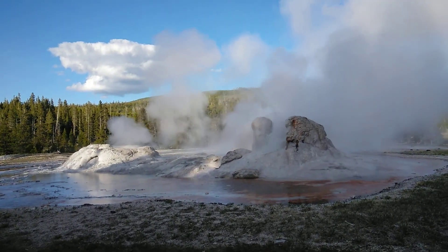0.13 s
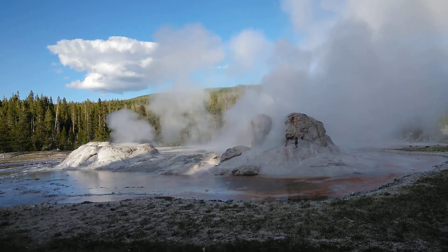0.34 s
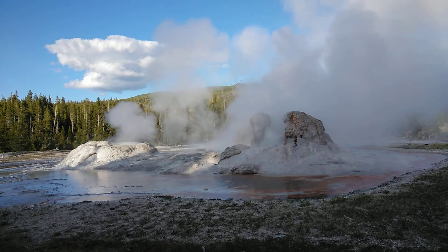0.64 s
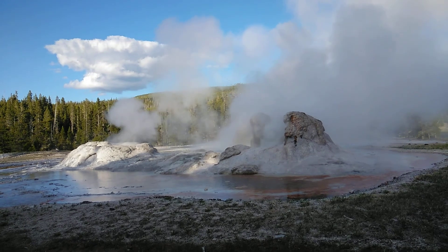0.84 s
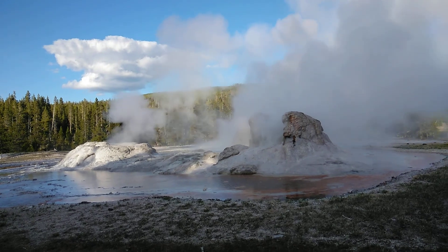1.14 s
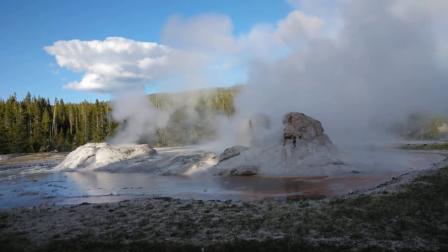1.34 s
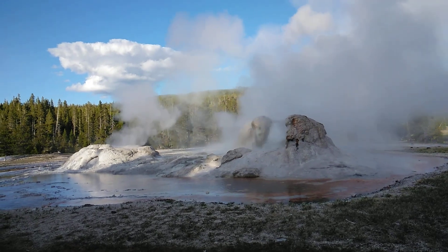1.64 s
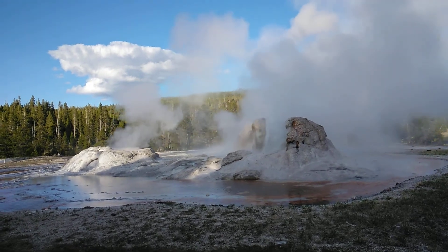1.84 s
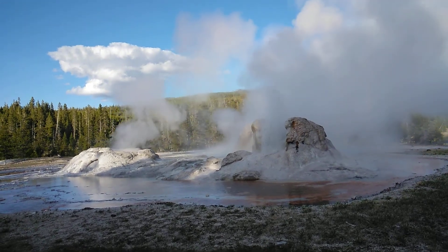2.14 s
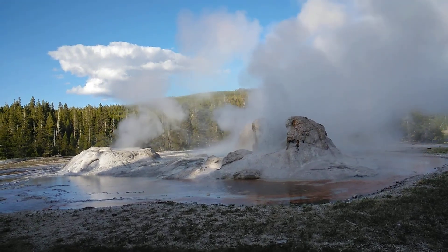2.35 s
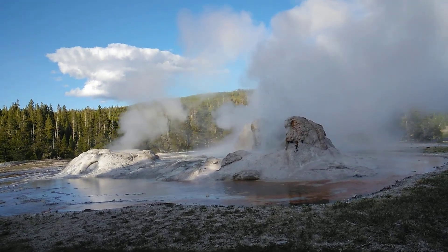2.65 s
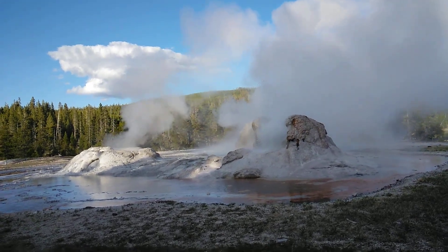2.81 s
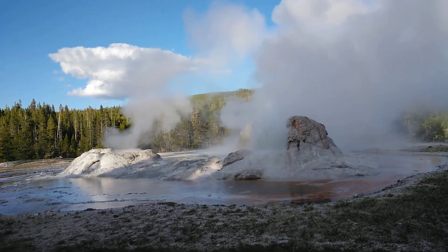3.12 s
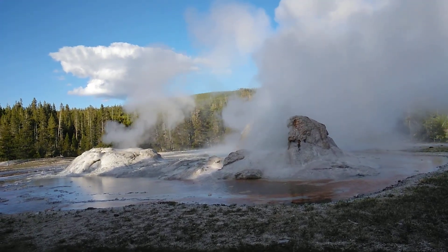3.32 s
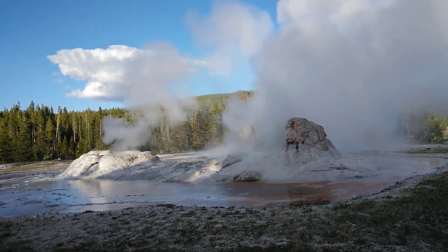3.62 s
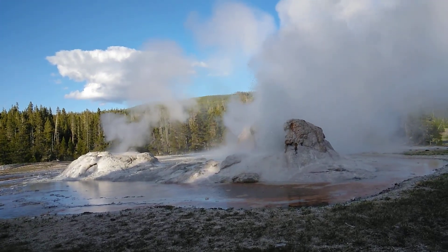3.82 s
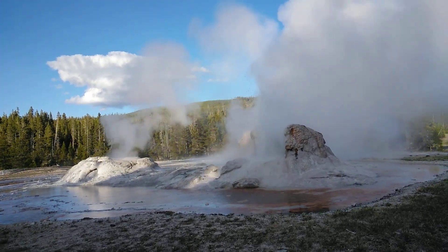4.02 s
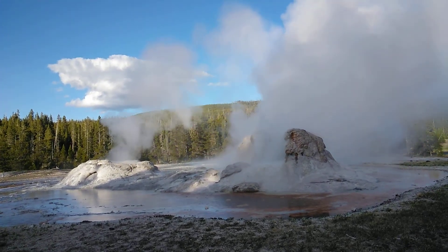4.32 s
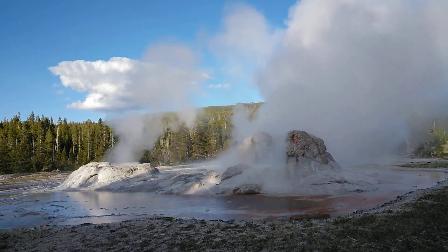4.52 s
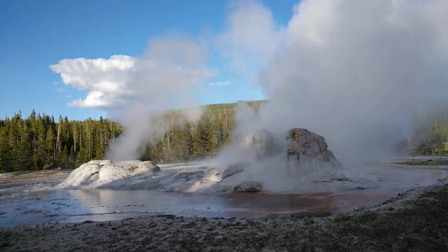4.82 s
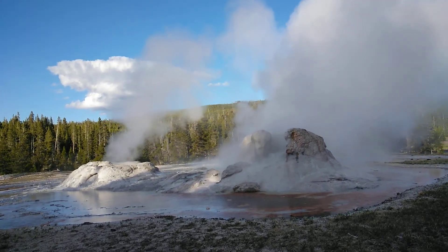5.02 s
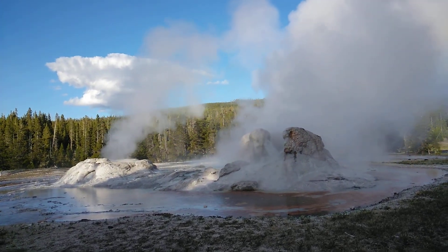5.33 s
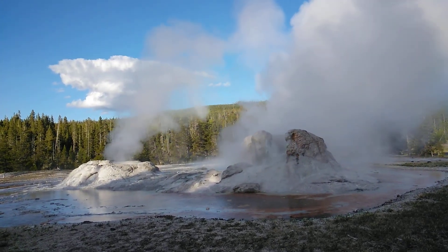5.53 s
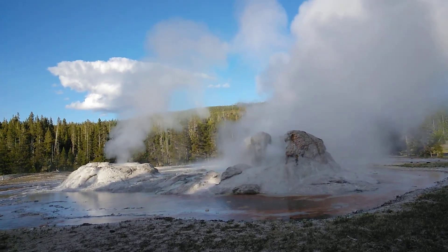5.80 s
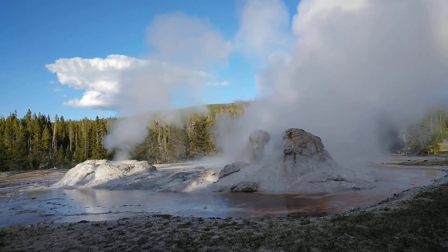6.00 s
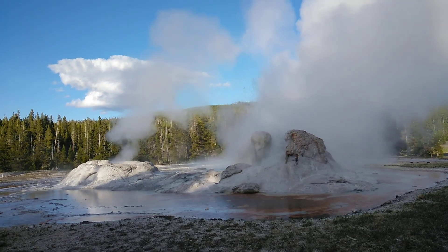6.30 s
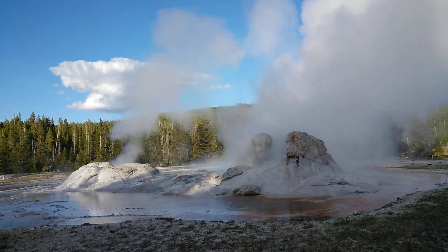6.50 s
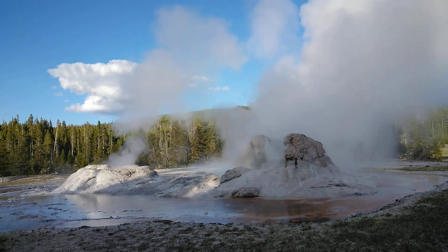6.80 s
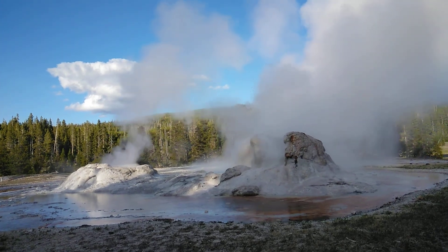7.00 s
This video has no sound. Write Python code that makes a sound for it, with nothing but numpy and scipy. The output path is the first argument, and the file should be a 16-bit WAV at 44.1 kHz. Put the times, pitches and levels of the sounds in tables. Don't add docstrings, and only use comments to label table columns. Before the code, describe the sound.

A geyser rumbles low under sloshing water, then surges with bright hissing spray and hard water slaps before easing back to a quieter wash.

```python
import sys
import numpy as np
from scipy import signal
from scipy.fft import rfft, irfft, next_fast_len
from scipy.io import wavfile
from scipy.ndimage import uniform_filter1d, map_coordinates

SR = 44100
rng = np.random.default_rng(int(sys.argv[2]) if len(sys.argv) > 2 else 0)


def gain_from_db(level_db):
    decades = np.asarray(level_db, float) / 20
    return 10 ** decades


def wav_record(signal):
    frames = np.transpose(np.atleast_2d(signal))
    bounded = np.clip(frames, -1, 1)
    quanta = np.round(bounded * 32767).astype(np.int16)
    wavfile.write(sys.argv[1], SR, quanta)


N = 315298

# frequency in Hz, density in dB per Hz.
RUMBLE_SPECTRUM = [(25, -16.5), (45, -6.5), (70, 4.5), (120, 3.5), (200, -1.5), (300, -4.5), (450, -13.5),
                   (650, -59), (900, -120)]
SPRAY_SPECTRUM = [(1500, -12), (2800, -0.5), (3800, 0.5), (7000, -1), (12000, 0), (13300, -6.5), (14300, 2),
                  (15200, -9)]
SPLASH_SPECTRUM = [(500, -58), (900, -12), (1300, -2), (2800, -2.5), (4000, -4.5), (4600, -8), (6000, -41)]
SLOSH_SPECTRUM = [(250, -49), (450, -2), (800, -2), (1100, -4), (1500, -16.5), (2500, -62)]
# frequency in Hz, density in dB per Hz.
CRACK_SPECTRUM = [(1500, -20), (2800, -6), (4000, -3), (7000, 0), (12000, 2), (13300, -4), (14300, 2),
                  (15200, -9)]

# time in seconds, spray level in dB, extra load of heavy water in dB.
JET = [(0.0, -43, 2), (0.42, -46, 5), (0.78, -44, -0.5), (1.2, -38, 1), (1.84, -43.5, 4), (1.9, -51, 5),
       (2.1, -48.5, 4), (2.67, -39.5, 3), (3.07, -35, -3), (3.37, -27.5, -5.5), (3.86, -36.5, 0.5),
       (4.2, -34.5, 1), (4.44, -31, 0), (4.84, -33.5, 0), (5.2, -50, 2.5), (5.45, -54.5, -1.5),
       (6.35, -47, 5.5), (7.15, -46.5, -0.5)]
# time in seconds, jump in dB, half length in seconds.
GUSHES = [(1.47, 0.5, .03), (2.02, 0.5, 0.018), (2.73, 2.5, .05), (2.77, 6, 0.011), (2.84, 3.5, 0.0094),
          (3.67, 0.5, 0.032), (3.87, -3, 0.029), (4.41, 1, 0.028), (5.22, 1.5, 0.019), (5.5, 0, 0.022),
          (6.22, -0.5, 0.035), (6.87, 1.5, 0.034), (2.93, 4.5, 0.091), (2.97, 0.5, 0.0091),
          (3.33, 2.5, 0.061), (3.385, 0, 0.031), (3.98, 2, 0.098), (4.3, 0.5, 0.018), (5.76, -0.5, 0.026),
          (5.73, 1.5, 0.044), (2.8, 0.5, .1), (5.87, -1.5, 0.032), (6.05, -1.5, 0.096)]
# time in seconds, jump in dB, half length in seconds.
HEAVES = [(.36, -2.5, 0.062), (.65, 4, 0.13), (1.33, 1, 0.048), (2.95, 2, 0.28), (3.42, 4, 0.049),
          (3.83, -5, 0.029), (5.08, -3.5, 0.21), (5.46, 5, 0.036), (6.95, 3, 0.1), (.2, 1.5, 0.088),
          (2, 0, 0.17), (4.55, -2.5, 0.097), (6, -2, 0.08), (6.2, 0.5, 0.051), (6.67, 0, .07),
          (7.12, 1.5, 0.046)]
# time in seconds, jump in dB, half length in seconds.
FALLS = [(2.8, -4, 0.088), (2.2, 2, 0.36), (4.41, 6.5, 0.022), (.08, 2.5, 0.034), (2.4, -1.5, 0.019),
         (2.7, 0, 0.054), (4.2, -3.5, 0.024), (5.9, 5.5, 0.022), (6.7, 1.5, 0.023), (6.75, -1, .04),
         (6.97, -5, 0.025), (2.3, 0, 0.081), (5.2, -7, 0.042), (6.42, 1.5, 0.025), (9, -1.5, 0.072),
         (5.63, -4.5, 0.083), (5.45, -0.5, 0.064), (0.042, -2.5, 0.11), (0.9, 2.5, .15), (2.9, 1, .1),
         (3.5, 1, .08), (4.7, 2, .08), (5.8, -3.5, .07), (5.15, -3.5, .04), (5.92, -7, 0.077),
         (6.07, -2, .06), (7.1, 2, .05)]
# time in seconds, jump in dB, half length in seconds.
POOL = [(.78, -1, 0.1), (1.45, 1.5, 0.15), (2.22, -3.5, 0.21), (3.54, -8.5, 0.06), (3.8, 2.5, 0.2),
        (4.95, -1, 0.13), (5.25, 2, 0.041), (5.6, 2, 0.057), (6.9, 0, 0.079), (5.82, 2.5, .05),
        (.15, -2, 0.12), (1.87, -1.5, 0.076), (2.6, -2.5, 0.2), (7.1, 2.5, .06), (6.01, -12, 0.11),
        (6.35, -6.5, 0.053), (6.75, -2, 0.053)]
# time in seconds, jump in dB, half length in seconds.
BIG_DROPS = [
    (.12, 2.5, 0.19),
    (4.45, 2, .1),
    (4.9, 1.5, 0.09),
    (5.36, -2, .04),
    (5.47, 1.5, .04),
    (5.57, -2.5, 0.037),
    (5.68, -3, 0.045),
    (5.87, -2, 0.053),
    (6.07, -5, .1),
    (7.1, -3.5, .06),
]
BIG_DROP_HZ = (2500, 4150)
# start in seconds, burst energy in dB.
SLAPS = [(.388, -16), (.4454, -16), (.4793, -15), (.4983, -15), (1.0406, -9), (1.6639, -12), (1.7543, -10),
         (1.8398, -11), (2.6997, -8), (2.7546, -4), (2.7663, 2.5), (2.7734, -4), (2.8016, -6), (2.8804, -7),
         (2.9072, -3), (2.9645, -2), (2.9683, 4), (2.982, -7), (3.063, -1.5), (3.0982, -4.5), (3.1841, -1),
         (3.2824, -4), (3.3294, 1), (3.3332, 4), (3.3475, -1), (3.354, -1), (3.3795, -1), (3.3835, -1),
         (3.3877, 9.5), (3.4908, 0), (3.5306, -3), (3.5604, -2.5), (3.994, -4), (4.2514, -8),
         (4.2959, -3.5), (4.3034, -3.5), (4.418, -4), (4.638, -5.5), (4.8374, -5), (4.9061, -7),
         (4.9269, -6), (5.1357, -18), (5.223, -21.5), (5.2812, -18), (5.366, -23), (5.5273, -24),
         (5.6976, -22), (5.7301, -19), (5.7599, -20), (5.8008, -21), (5.9153, -22), (5.9207, -22),
         (6.3293, -15), (6.4645, -17), (6.475, -17.5), (6.721, -15), (6.7383, -16), (6.7491, -17.5),
         (6.7973, -17), (6.8758, -15), (6.9871, -19)]
# time in seconds, right-side gain in dB of sloshing, of falling water, of spray.
DRIFT = [(0, -2, -0.5, 0.5), (.5, -4, -3.5, 0.5), (.9, -2, -2, 0.5), (1.6, 1.5, 0.5, 0),
         (1.9, -4.5, -4.5, -0.5), (2.6, -4, 0, -0.5), (2.9, 0.5, 1.5, -1), (4.9, 0.5, 0, 0),
         (5.2, -3, -3, 0), (5.45, 0.5, -0.5, -4.5), (5.75, 2, -1.5, 0.5), (5.95, -3, -6, -1.5),
         (6.2, 1, -1, -1), (6.5, 0, -3.5, -0.5), (6.85, 5.5, -5, 0), (7.15, 1.5, -5, -0.5)]

# frequency in Hz, left gain in dB, right gain in dB, likeness of the sides 0-1,
# lead of the right side in radians.
PORTS = [(30, 0, -.3, .9, 2.85), (70, 0, -1.3, .97, 2.85), (300, 0, -1.6, .975, 2.85),
         (1100, -.5, -4.3, .8, 2.55), (1500, -.5, -3, .76, 2.1), (1900, .5, -2.3, .74, 1.95),
         (2330, 0, -3.7, .72, 1.85), (2700, 2.2, -3.5, .7, 1.8), (2860, -2, -3.5, .8, 2.6),
         (3000, -6.5, -6, .85, 3), (3120, -7, -5.5, .3, 4.5), (3260, -3, -5.5, .85, 6.3),
         (3580, -1.5, -4.5, .55, 6.9), (3780, -4.2, -4, .7, 6.4), (3880, -3.5, -3, .8, 6.2),
         (4450, 5, -7.3, .5, 5.9), (4950, 8.5, -5, .6, 6.6), (6600, -2, -8, .4, 5.9),
         (7400, 2.3, -10.8, .38, 5.1), (8200, -.2, -12.5, .37, 4.6), (9700, 5, -15, .35, 3.8),
         (12200, 0, -18, .2, 4.2), (14500, -14, -25, .1, 4.2)]
# frequency in Hz, strength 0-1.
BOUNCE = [(200, .55), (600, .72), (1300, .53), (2000, .45), (2600, .12), (4000, .08), (8000, .02)]
# delay in seconds, strength 0-1, fades above this Hz.
CASE_COPY = (.0011, .42, 6500)
# frequency in Hz, level in dB.
HUSH = [(100, -67), (500, -69.5), (1300, -74.5), (3000, -79.5), (6000, -83.5), (13000, -90)]
# frequency in Hz, left level over its rounding step in dB,
# right level over its step in dB, quietest level the step follows in dB.
MEMORY_FINENESS = [(600, 29, 28, -80), (850, 24, 24, -78), (1050, 9, 8, -68), (1300, 5, 4, -64),
                   (1600, 6, 4, -64), (1950, 3, 2, -61), (2500, 4, 2, -60), (3050, 1, 2, -55),
                   (3300, 3, 1, -54), (3550, 0, -1, -48), (3850, -2, -2, -47), (4200, 4, -2, -58),
                   (5000, 11, -3, -68), (6600, 2, -5, -70), (7300, 6, -5, -72), (8100, 4, -6, -72),
                   (9700, 10, -7, -72), (12000, 7, -7, -68), (12900, -4, -7, -60), (13800, -8, -10, -53),
                   (14600, -13, -13, -50), (15100, -16, -16, -58), (15500, -17.5, -17.5, -66)]
JOINT_HZ = [1120, 1210, 1380, 1550, 1720, 1900, 2070, 2240, 2420, 2580, 2760, 2870, 2960, 3060, 3170, 3300,
            3450, 3620, 3790, 3960, 4130]

USUAL_DB = -43
RUMBLE_DB, RUMBLE_FOLLOWS, RUMBLE_EASES_DB = -52, .089, -1
SPLASH_DB, SPLASH_FOLLOWS = -55.5, .85
RUNOFF_DB, RUNOFF_FOLLOWS = -54.5, .6
SLOSH_DB, SLOSH_FOLLOWS, SLOSH_LOAD, SLOSH_EASES_DB = -58, .45, .61, -5
SLOSH_RETREAT_DB = -2.5
EASE_S, EASE_LENGTH_S = 5.05, .17
SLAP_RISE_S, SLAP_FALL_S, SLAP_LEAD_S = .00012, .001, .001
SLAP_BODY_DB = -16
BOUNCE_S, BOUNCE_RAD = .00142, 1.1
SWAY, SWAY_HZ = .022, (1.7, 3.9, 6.3)
JOINT_DB, WEAK_DB = 5.8, 9


def unit(x):
    return x / np.sqrt(np.mean(x ** 2) + 1e-20)


def centred(x):
    return x / np.sqrt(np.mean(x.mean(0) ** 2))


def along(points, hz):
    f, *cols = np.transpose(points)
    return [np.interp(np.log(hz + 1), np.log(f + 1), c) for c in cols]


def curves(rows):
    s, *cols = np.transpose(rows)
    return [np.interp(np.arange(N) / SR, s, c) for c in cols]


def bumps(rows):
    t = np.arange(N) / SR
    return sum(db * np.exp(-((t - s) / half) ** 2) for s, db, half in rows)


def wobble(rate):
    knots = rng.standard_normal(int(N * rate / SR) + 4)
    return map_coordinates(knots, [np.arange(N) * rate / SR])


def patchy(depth_db):
    z = signal.stft(rng.standard_normal((2, N)), nperseg=512)[2]
    field = uniform_filter1d(rng.standard_normal(z.shape[1:]), size=8, axis=0)
    field = uniform_filter1d(field, size=10, axis=1)
    return unit(signal.istft(z * gain_from_db(depth_db * unit(field)), nperseg=512)[1][:, :N])


def heard(pair, spectrum, low=1):
    m = next_fast_len(N + 8192)
    hz = np.fft.rfftfreq(m, 1 / SR)
    left_db, right_db, alike, _ = along(PORTS, hz)
    lead = np.array([along(PORTS, hz * (1 + way * SWAY))[3] for way in (-.8, 1.5)])
    turn = np.arccos(np.clip(alike, 0, 1)) / 2

    ground_lag = np.exp(-1j * (2 * np.pi * hz * BOUNCE_S + BOUNCE_RAD))
    ground = np.clip(low * along(BOUNCE, hz)[0], 0, .9) * ground_lag
    shade = np.clip(1.3 - hz / 1600, .3, 1)
    case_s, case_strength, case_fade_hz = CASE_COPY
    bends = np.clip(hz / 1500 - 1, 0, 1) / (1 + (hz / case_fade_hz) ** 4)
    case = 1 - case_strength * bends * np.exp(-2j * np.pi * hz * case_s)

    coloured = rfft(pair, m) * gain_from_db(along(spectrum, hz)[0])
    common, stray = coloured * [np.cos(turn), np.sin(turn)]
    left = (common * (1 - ground) + stray) * gain_from_db(left_db)
    right = (common * case * (1 - shade * ground) - stray) * gain_from_db(right_db) * np.exp(1j * lead)
    left, one_way, other_way = irfft([left, *right], m)[:, :N]
    sway = np.sin(2 * np.pi * np.outer(SWAY_HZ, np.arange(N) / SR)).sum(0)
    drift = (1 + np.tanh(sway)) / 2
    return np.array([left, drift * one_way + (1 - drift) * other_way])


def pressure():
    spray_db, load_db = curves(JET)
    eased = (1 + np.tanh((np.arange(N) / SR - EASE_S) / EASE_LENGTH_S)) / 2
    return spray_db + bumps(GUSHES) - USUAL_DB, load_db, eased


def heavy_water(jet_db):
    return uniform_filter1d(jet_db, size=3000)


def behind_case():
    return [np.array([0 * db, db]) for db in curves(DRIFT)]


def spatter(count, ms):
    moments = (rng.random(count) * N).astype(int)
    hits = np.bincount(moments, minlength=N).astype(float)
    u = np.arange(400) / SR / (ms / 1000)
    return unit(np.sqrt(abs(signal.fftconvolve(hits, u * np.exp(-u))[:N])))


def vent():
    jet_db, _, eased = pressure()
    rumble_db = RUMBLE_DB + RUMBLE_FOLLOWS * jet_db + RUMBLE_EASES_DB * eased + bumps(HEAVES)
    rumble_db = rumble_db + .9 * wobble(4.2) + .9 * wobble(9)
    return gain_from_db(rumble_db) * centred(heard(patchy(depth_db=1.6), RUMBLE_SPECTRUM))


def slosh():
    jet_db, load_db, eased = pressure()
    slosh_db = SLOSH_DB + SLOSH_FOLLOWS * heavy_water(jet_db) + SLOSH_LOAD * load_db
    slosh_db = slosh_db + SLOSH_EASES_DB * eased + bumps(POOL) + 1.4 * wobble(10)
    retreat_db = np.array([0 * eased, SLOSH_RETREAT_DB * eased])
    level = gain_from_db(slosh_db + behind_case()[0] + retreat_db)
    return level * centred(heard(patchy(depth_db=1.5), SLOSH_SPECTRUM))


def runoff():
    jet_db, load_db, _ = pressure()
    runoff_db = RUNOFF_DB + RUNOFF_FOLLOWS * heavy_water(jet_db) + load_db
    runoff_db = runoff_db + bumps(FALLS) + .9 * wobble(5)
    level = gain_from_db(runoff_db + behind_case()[1])
    return level * centred(heard(patchy(depth_db=1.3), SPLASH_SPECTRUM, low=1.3))


def splash(gush_db, puffs):
    jet_db, load_db, _ = pressure()
    splash_db = SPLASH_DB + SPLASH_FOLLOWS * heavy_water(jet_db) + load_db + bumps(FALLS)
    splash_db = splash_db + 1.2 * wobble(7) + .41 * gush_db
    source = patchy(depth_db=2.5) * (1 + .16 * puffs)
    return gain_from_db(splash_db + behind_case()[1]) * centred(heard(source, SPLASH_SPECTRUM, low=.45))


def spray(gush_db, puffs):
    spray_db = USUAL_DB + pressure()[0] + .1 + gush_db
    source = patchy(depth_db=1.1) * (1 + .3 * puffs)
    return gain_from_db(spray_db + behind_case()[2]) * centred(heard(source, SPRAY_SPECTRUM))


def sized(x):
    drops = signal.sosfiltfilt(signal.butter(2, BIG_DROP_HZ, "band", fs=SR, output="sos"), x)
    return x + (gain_from_db(bumps(BIG_DROPS)) - 1) * drops


def water():
    gush_db = .4 * wobble(12) + .36 * wobble(36)
    puffs = spatter(count=2200, ms=.6)
    return slosh() + sized(runoff() + splash(gush_db, puffs) + spray(gush_db, puffs))


def slaps():
    t = np.clip(np.arange(600) / SR - SLAP_LEAD_S, 0, None)
    shape = (1 - np.exp(-t / SLAP_RISE_S)) * np.exp(-t / SLAP_FALL_S)
    hits = np.zeros((2, N + len(t)))
    for s, db in SLAPS:
        burst = rng.standard_normal((2, len(t))) * shape
        burst = burst / np.linalg.norm(burst, axis=1, keepdims=True)
        hits[:, round(s * SR):][:, :len(t)] += gain_from_db(db - 1.5) * burst
    hits = hits[:, :N]
    return heard(hits, CRACK_SPECTRUM) + gain_from_db(SLAP_BODY_DB) * heard(hits, SPLASH_SPECTRUM)


def scene():
    return vent() + water() + slaps()


def hush(x):
    hz, _, z = signal.stft(x, SR, nperseg=1024)
    power = uniform_filter1d(abs(z) ** 2, size=3, axis=1)
    power = abs(uniform_filter1d(power, size=5, axis=2)) + 1e-20
    floor = gain_from_db(2 * along(HUSH, hz)[0])[:, None]
    keep = np.maximum(1 - floor / power, gain_from_db(-25))
    return signal.istft(z * np.sqrt(keep), SR, nperseg=1024)[1][:, :N]


def sum_and_difference(v):
    return np.array([v[0] + v[1], v[0] - v[1]]) / np.sqrt(2)


def stored(x, start):
    n = 1024
    lines = np.arange(n) + .5
    hz = lines * SR / (2 * n)
    t = np.arange(2 * n) + .5
    window = np.sin(np.pi * t / (2 * n))[:, None]
    basis = window * np.cos(np.pi / n * np.outer(t + n / 2, lines)) * np.sqrt(2 / n)
    x = np.pad(x, ((0, 0), (2 * n - start, 3 * n)))
    halves = x[:, :x.shape[1] // n * n].reshape(2, -1, n)
    c = halves[:, :-1] @ basis[:n] + halves[:, 1:] @ basis[n:]

    around = uniform_filter1d(uniform_filter1d(c ** 2, size=48, axis=2), size=3, axis=1)
    jitter = uniform_filter1d(rng.standard_normal((*c.shape[:2], n // 8)), size=2, axis=1)
    jitter_db = np.repeat(4.4 * unit(jitter), 8, axis=2)
    *fine_db, least_db = along(MEMORY_FINENESS, hz)
    step = np.sqrt(abs(around) + gain_from_db(2 * least_db)) * gain_from_db(jitter_db - np.array(fine_db)[:, None])

    both = sum_and_difference(c)
    band = np.searchsorted(JOINT_HZ, hz)
    members = band[:, None] == np.arange(len(JOINT_HZ) + 1)
    power = uniform_filter1d(both ** 2 @ members, size=2, axis=1)[..., band]
    leads = power.max(0) > gain_from_db(2 * JOINT_DB) * power.min(0)
    joint = leads & (band > 0) & (band < len(JOINT_HZ))
    joint_step = step[0] * gain_from_db(WEAK_DB * (power < power[::-1]))
    c, step = np.where(joint, both, c), np.where(joint, joint_step, step)

    c = np.sign(c) * step * np.floor(abs(c / step) ** .75 + .4054) ** (4 / 3)
    c = np.where(joint, sum_and_difference(c), c)
    halves = (c @ basis[n:].T)[:, :-1] + (c @ basis[:n].T)[:, 1:]
    return halves.reshape(2, -1)[:, n - start:][:, :N]


def top_cut(x):
    return signal.sosfilt(signal.butter(12, 15720, fs=SR, output="sos"), x)


def record(dry):
    mix = stored(hush(dry), start=743)
    return top_cut(mix)


dry = scene()
out = record(dry)
wav_record(out)
```